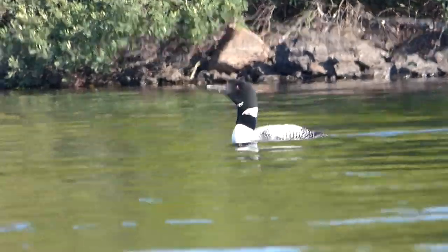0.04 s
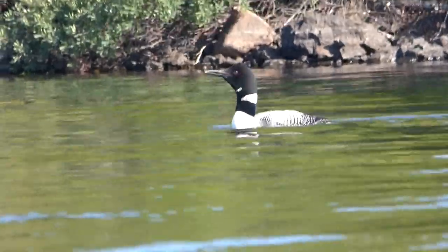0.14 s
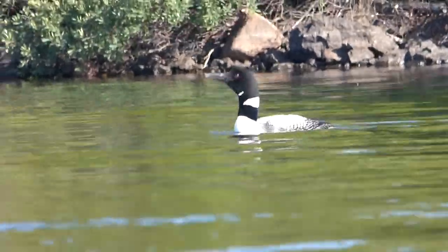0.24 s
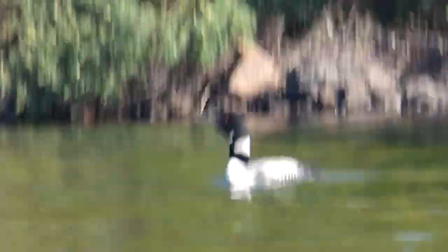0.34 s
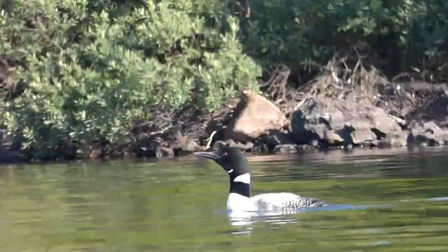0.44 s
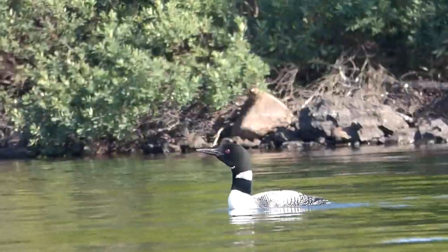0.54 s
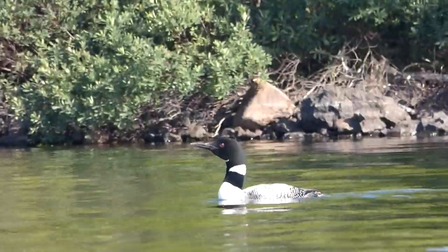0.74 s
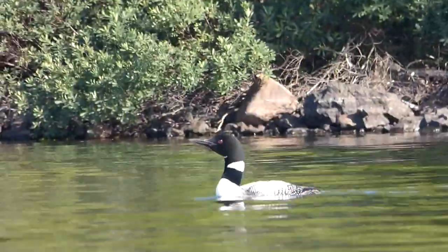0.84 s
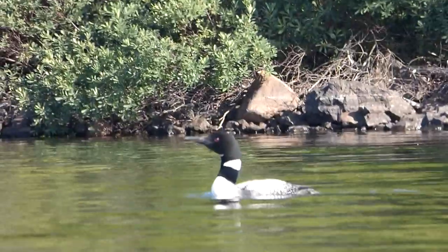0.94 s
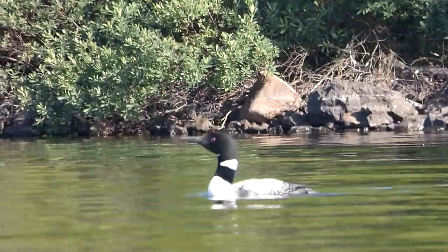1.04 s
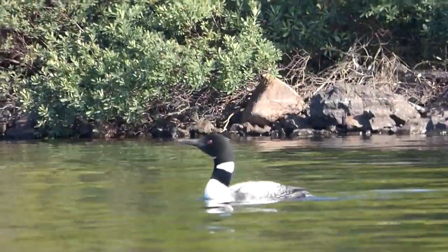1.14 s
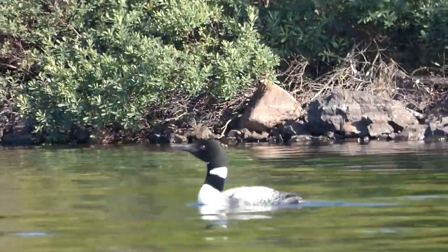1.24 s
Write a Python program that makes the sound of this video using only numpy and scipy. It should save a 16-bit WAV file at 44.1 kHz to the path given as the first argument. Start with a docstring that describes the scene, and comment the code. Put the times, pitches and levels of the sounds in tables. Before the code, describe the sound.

One quavering loon call rings out over gentle wavelets and light wind on the microphone.

```python
"""A loon gives one tremolo call across a lake: a reedy low opening breaks upward into a loud, nearly
pure high register whose pitch swings ten times a second. The wooded shore scatters back a faint echo.
Close by, wavelets gurgle with gliding bubbles and spatter droplets, wind bumps the microphone and a
hand-held camera ticks softly, all over a soft wash of water and air, with the camera's faint whir."""
import sys
import numpy as np
from scipy import signal
from scipy.fft import rfft, irfft
from scipy.io import wavfile
from scipy.ndimage import uniform_filter1d

SR = 44100
rng = np.random.default_rng(int(sys.argv[2]) if len(sys.argv) > 2 else 0)


def generate_wav(signal):
    """Clip the signal to [-1, 1] and save it as 16-bit WAV at the path in sys.argv[1]."""
    frames = np.transpose(np.atleast_2d(signal))
    scaled = np.clip(frames, -1, 1) * 32767
    pcm = np.round(scaled).astype(np.int16)
    wavfile.write(sys.argv[1], SR, pcm)


N = 57330

# reedy opening in the low register: time_s, pitch_hz, level_db
CALL_OPENING = [(.145, 722.3, -80), (.162, 692.6, -29), (.182, 662, -45), (.2, 694, -36),
                (.215, 791.5, -27.5), (.236, 840, -24), (.258, 802.4, -27.5), (.275, 735, -31.5),
                (.293, 695, -33.5), (.31, 813, -27.5), (.325, 898, -20.5), (.331, 870, -61)]
# second tone that beats with the voice at the upward break: time_s, pitch_hz, level_db
CALL_BREAK = [(.325, 1262, -23), (.331, 1315, -19.5), (.341, 1273, -20.5), (.365, 1240, -52)]
# tremolo in the high register: time_s, pitch_hz, level_db
CALL_TREMOLO = [(.326, 1434, -17), (.331, 1485, -18.5), (.343, 1511, -13.5), (.358, 1426, -18.5),
                (.377, 1275, -24.5), (.394, 1209, -30), (.405, 1352, -17), (.425, 1488, -13),
                (.44, 1540, -11.5), (.456, 1492, -14.5), (.476, 1301, -24), (.497, 1217, -32),
                (.511, 1335, -18), (.529, 1471, -11), (.546, 1524, -11), (.561, 1473, -15.5),
                (.58, 1310, -23.5), (.6, 1165, -30), (.617, 1240, -32)]
# swoop in the middle register: time_s, pitch_hz, level_db
CALL_SWOOP = [(0.609, 968.6, -40.5), (0.622, 997.4, -24.5), (0.63, 1065, -16), (0.639, 1206, -12),
              (0.652, 1257, -16), (0.657, 1213, -31), (0.673, 1260, -34)]
# last swing in the high register: time_s, pitch_hz, level_db
CALL_LAST_SWING = [(0.641, 1416, -55), (0.651, 1437, -12.5), (0.662, 1469, -15), (0.678, 1380, -19.5),
                   (0.695, 1285, -26), (.712, 1188, -28.5), (0.727, 1210, -53)]
# closing drop to the low register: time_s, pitch_hz, level_db
CALL_CLOSING = [(0.715, 1020, -32), (0.725, 921, -41), (0.725, 693, -34.5), (0.746, 683, -34.5),
                (0.796, 663.6, -42.5), (0.804, 664, -33)]
# overtones of the opening, against a fundamental at LOW_REF_DB: frequency_hz, relative_db
LOW_TIMBRE = [(1400, 1.5), (1660, -0.5), (1850, -13), (3400, -31.5), (3950, -23), (4400, -30), (5350, -14),
              (7400, -20), (8600, -27), (11000, -37)]
# overtones of the other notes, against a fundamental at HIGH_REF_DB: frequency_hz, relative_db
HIGH_TIMBRE = [(2200, -27), (2900, -43.5), (3800, -28.5), (5100, -34.5), (5800, -26.5), (7700, -31),
               (10800, -38), (12500, -85)]
# notches between throat resonances, where passing overtones drop out: centre_hz, gain_db
THROAT_NOTCHES = [(6150, -16), (7130, -10), (8680, -10)]
# stretches of shore that throw back the top of each swing: delay_s, gain_db
SHORE_RETURNS = [(0.144, -23.5), (0.279, -19.5), (.47, -28.5)]
# bubbles in the lapping water: start_s, length_s, start_hz, end_hz, level_db
WATER_BUBBLES = [(0.569, 0.058, 482, 529, -37.5), (0.844, 0.062, 320, 364, -41),
                 (0.885, 0.024, 429, 555.6, -32.5), (0.904, 0.027, 561, 887, -34.5),
                 (1.191, 0.016, 1667, 1676, -44), (.38, 0.036, 486, 515, -49), (0.671, 0.1, 354, 366, -47),
                 (1.027, 0.073, 332.4, 331, -44), (1.115, 0.024, 1136, 1227, -35),
                 (1.122, 0.04, 268, 290, -34.5), (1.149, 0.025, 638, 950, -37)]
# slaps and spatter of wavelets: start_s, level_db, centre_hz, decay_s, pan_db
WATER_SLAPS = [(0.521, -43.5, 5220, 0.0036, 0), (0.704, -45.5, 8400, 0.012, 8),
               (0.719, -31, 8470, 0.003, 9.5), (0.796, -42.5, 5980, 0.0038, 5),
               (0.76, -42.5, 7400, 0.008, 7), (0.888, -39, 4800, 0.004, 7), (0.907, -42.5, 4280, 0.003, 1),
               (0.932, -45, 3607, 0.0016, 8), (1.03, -47.5, 8595, 0.0046, 0.5),
               (1.031, -29, 1436, 0.0029, -5), (1.044, -40.5, 8495, 0.0036, -3),
               (1.047, -40.5, 4600, 0.006, -2), (1.106, -38.5, 2560, 0.0047, 4.5),
               (1.115, -30.5, 934, 0.0073, 10), (1.122, -34.5, 390, 0.0046, 4),
               (1.121, -36, 4840, 0.0026, 5.5), (1.129, -37, 8800, 0.0038, 2.5),
               (1.167, -45.5, 8390, 0.0056, -5), (1.188, -43, 7095, 0.0014, -2),
               (1.236, -47, 4440, 0.0055, 6)]
# wavelets that throw droplets: centre_s, half_length_s
DROPLET_SPRAYS = [(0.717, 0.12), (0.853, 0.022), (1.103, 0.063)]
# wind bumps on the microphone: peak_s, level_db, centre_hz, rise_s, decay_s
WIND_BUMPS = [(0.074, -40.5, 144, 0.031, 0.047), (0.126, -40.5, 102, 0.049, 0.02),
              (0.193, -31, 117, 0.029, 0.04), (0.231, -41.5, 106, 0.0046, 0.082)]
# soft low knocks: start_s, length_s, start_hz, end_hz, level_db
LOW_KNOCKS = [(.2, 0.015, 366, 79, -25.5), (.561, 0.021, 158, 91, -38.5), (0.958, 0.036, 122, 67.7, -41.5)]
# camera ticks: start_s, level_db
CAMERA_TICKS = [(0.063, -30.5), (0.155, -29.5), (0.259, -32), (0.563, -35), (0.763, -39.5), (0.86, -31)]
# ring of the camera body: frequency_hz, relative_db
TICK_SPECTRUM = [(100, -9), (450, -11), (750, -6.5), (1200, 9.5), (1500, -6), (2100, 1.5), (3000, -18.5),
                 (6000, -21), (15000, -40)]
# wash of water and air, common to both sides: frequency_hz, relative_db
LAKE_SPECTRUM = [(25, -22), (70, -7.5), (330, -1.5), (420, -7.5), (500, 9), (600, 0), (1600, -5),
                 (2600, -18), (8000, -24), (15000, -30.5)]
# soft whir of the camera mechanism, differing between the sides: frequency_hz, relative_db
CAMERA_WHIR_SPECTRUM = [(25, -25), (380, -14.5), (550, 3.5), (780, 10.5), (1250, -3.5), (1700, -17),
                        (3000, -27.5), (15000, -48)]
# fader ride on the wash of water and air: time_s, gain_db
LAKE_SWELL = [(0, 2), (.2, 2.5), (.9, 2.5), (0.989, 0), (1.126, 7.5), (1.22, 2)]

LOW_REF_DB, HIGH_REF_DB = -24, -23
LOW_GROWTH, HIGH_GROWTH = 2.38, 0.72  # dB of overtone per dB of fundamental


def loon():
    """The call: an opening that turns reedy as it swells, a raspy break, then nearly pure tones."""
    voice = voice_note(CALL_OPENING, LOW_TIMBRE, LOW_REF_DB, LOW_GROWTH)
    voice += voice_note(CALL_TREMOLO, HIGH_TIMBRE, HIGH_REF_DB, HIGH_GROWTH)
    purer = np.array(HIGH_TIMBRE) + [0, -2]  # overtones 2 dB down
    for curve in (CALL_BREAK, CALL_SWOOP, CALL_LAST_SWING, CALL_CLOSING):
        voice += voice_note(curve, purer, HIGH_REF_DB, HIGH_GROWTH)
    break_s, rasp_rise_s = CALL_BREAK[0][0], 0.024
    puff = burst(break_s + rasp_rise_s, rasp_rise_s, decay_s=0.025)
    rasp = amp(-43) * puff * noise(hump(6700, octaves=0.43, skirt_db=-35))
    lead_rad = 0.23  # the voice reaches the left side slightly earlier
    stereo = (voice * np.exp(0.5j * lead_rad * np.array([[1], [-1]]))).real
    return pan(stereo + rasp, -1)


def voice_note(curve, timbre, ref_db, growth):
    """One note as a complex wave: a clean fundamental with overtones shaped by the throat."""
    glide_s, swell_s, edge_s = 0.009, 0.006, 0.002
    flutter_db, lean_db, notch_width_hz = 1.6, 4, 170
    times, curve_hz, curve_db = np.transpose(curve)
    t = np.arange(N) / SR
    contour_hz = np.interp(t, times, curve_hz)
    jitter = 0.002 * unit(smooth(rng.standard_normal(N), 0.005))
    hz = smooth(contour_hz, glide_s) * (1 + jitter)
    rising = smooth(np.sign(np.gradient(contour_hz)), 2 * glide_s)
    level_db = smooth(np.interp(t, times, curve_db), swell_s)
    drive_db = ref_db + growth * (level_db - ref_db)
    fundamental = np.exp(2j * np.pi * np.cumsum(hz) / SR)
    wave, partial = amp(level_db) * fundamental, fundamental
    for k in range(2, 14):
        partial = partial * fundamental * np.exp(2j * np.pi * rng.random())
        flutter = flutter_db * unit(smooth(smooth(rng.standard_normal(N), 0.0011), 0.0089))
        notches = sum(db * np.exp(-((k * hz - at) / notch_width_hz) ** 2) for at, db in THROAT_NOTCHES)
        lean = -(-1) ** k * lean_db * rising  # odd overtones flare on the way up, even on the way down
        wave += partial * amp(drive_db + read(timbre, k * hz) + notches + lean + flutter)
    gate = np.clip(np.minimum(t - times[0], times[-1] - t) / edge_s, 0, 1)
    return gate * wave


def shore_echo(call):
    """The shore's answer: a long faint tail, ringing returns of the pitch peaks and a short near slap."""
    ring_hz, ring_width_hz = 1495, 26.7  # near the top of each swing
    ring = signal.lfilter(*signal.iirpeak(ring_hz, ring_hz / ring_width_hz, SR), call)
    tail = amp(-21) * reflections(call, delay_s=0.12, t60_s=3.9)
    returns = sum(amp(db) * reflections(ring, delay_s, t60_s=0.55) for delay_s, db in SHORE_RETURNS)
    near = amp(-22.5) * reflections(call, delay_s=0.0027, t60_s=0.2, spread=0.32)
    return pan(tail + returns + near, -3.4)


def reflections(sound, delay_s, t60_s, spread=0.61, taps_per_s=2000):
    """Rocks and trees scatter a sound into a fading cloud of reflections."""
    t = np.arange(N) / SR - delay_s
    taps = rng.standard_normal((2, N)) * (rng.random((2, N)) < taps_per_s / SR)
    mid, side = taps * (t > 0) * amp(-60 * abs(t) / t60_s)
    response = mid_side(mid, spread * side)
    response /= np.linalg.norm(response[0])
    return signal.fftconvolve(sound.mean(0)[None], response, axes=1)[:, :N]


def wavelets(rise_s=0.0016):
    """Lapping water: bubbles gurgle as gliding tones, slaps spatter as short bursts of noise."""
    out = np.zeros((2, N))
    for start_s, *bubble in WATER_BUBBLES:
        add(out, start_s, blip(*bubble))
    for start_s, db, hz, decay_s, pan_db in WATER_SLAPS:
        envelope = amp(db) * burst(start_s + rise_s, rise_s, decay_s)
        out += pan(envelope * noise(hump(hz, octaves=0.23, skirt_db=-16)), pan_db)
    return out


def droplets(peak_per_s=560, decay_s=0.00053):
    """Tiny bright drops land at random, thickest as each wavelet comes in."""
    t = np.arange(N) / SR
    density = sum(np.exp(-((t - centre_s) / half_s) ** 2) for centre_s, half_s in DROPLET_SPRAYS)
    hits = rng.random(N) < peak_per_s / SR * density
    strength = amp(4 * np.minimum(rng.exponential(1, N), 3))
    envelope = signal.lfilter([1], [1, -np.exp(-1 / (decay_s * SR))], hits * strength)
    fizz = noise(hump(6930, octaves=0.46, skirt_db=-1))
    return pan(amp(-60.5) * unit(envelope * fizz), 1.6)


def wind(spread=0.31):
    """Gusts bump the microphone with low noise, partly different on each side."""
    out = np.zeros((2, N))
    for peak_s, db, hz, rise_s, decay_s in WIND_BUMPS:
        mid, side = (noise(hump(hz, octaves=0.69, skirt_db=-49)) for _ in range(2))
        out += amp(db) * burst(peak_s, rise_s, decay_s) * mid_side(mid, spread * side)
    return pan(out, 3.5)


def knocks():
    """Soft low knocks, each a short tone diving in pitch."""
    out = np.zeros(N)
    for start_s, *knock in LOW_KNOCKS:
        add(out, start_s, blip(*knock))
    return pan(out, 3.5)


def camera_ticks(rise_s=0.0022, decay_s=0.0066):
    """Dull ticks ring briefly in the camera body, different on each side."""
    envelope = sum(amp(db) * burst(start_s + rise_s, rise_s, decay_s) for start_s, db in CAMERA_TICKS)
    body = np.array([noise(lambda hz: read(TICK_SPECTRUM, hz)) for _ in range(2)])
    return pan(envelope * body, -3.5)


def lake_and_whir():
    """A soft wash of water and air, swelling as a wavelet arrives, with the camera's faint whir."""
    swell_db = np.interp(np.arange(N) / SR, *np.transpose(LAKE_SWELL))
    lake = amp(-45 + swell_db) * wash(LAKE_SPECTRUM)
    whir = amp(-37) * wash(CAMERA_WHIR_SPECTRUM)
    return mid_side(lake, whir)


def wash(spectrum, patch_db=3.5):
    """Noise in which small patches of the spectrum come and go."""
    framing = dict(nperseg=512, noverlap=384)
    frames = signal.stft(noise(lambda hz: read(spectrum, hz)), **framing)[2].T
    patches = uniform_filter1d(rng.standard_normal(frames.shape), size=6, axis=0)  # blur in time
    patches = unit(uniform_filter1d(patches, size=14, axis=1))  # blur in frequency
    return unit(signal.istft((frames * amp(patch_db * patches)).T, **framing)[1][:N])


def blip(length_s, start_hz, end_hz, db, skew=0.84):
    """A short gliding tone that swells and fades."""
    progress = np.arange(0, length_s, 1 / SR) / length_s
    phase = 2 * np.pi * np.cumsum(start_hz * (end_hz / start_hz) ** progress) / SR
    return np.sqrt(2) * amp(db) * np.sin(np.pi * progress ** skew) * np.sin(phase)


def burst(peak_s, rise_s, decay_s):
    """Envelope with an exponential attack and decay."""
    t = np.arange(N) / SR - peak_s
    return np.exp(np.minimum(t / rise_s, -t / decay_s))


def noise(colour):
    """Noise at rms 1, shaped by an EQ curve that maps Hz to dB."""
    gain = amp(colour(np.fft.rfftfreq(N, 1 / SR)))
    return unit(irfft(rfft(rng.standard_normal(N)) * gain, N))


def hump(centre_hz, octaves, skirt_db):
    """EQ curve: a rounded peak on a wider skirt."""
    def colour(hz):
        octaves_off = np.log2((hz + 1) / centre_hz)
        peak = np.exp(-0.5 * (octaves_off / octaves) ** 2)
        skirt = amp(skirt_db) / (1 + octaves_off ** 4) / (1 + (hz / 11000) ** 8)
        return 20 * np.log10(peak + skirt)
    return colour


def read(spectrum, hz):
    """Reads a spectrum on a log-frequency axis."""
    points_hz, points_db = np.transpose(spectrum)
    return np.interp(np.log(hz + 1), np.log(points_hz), points_db)


def amp(db):
    """Decibels to gain."""
    return 10 ** (np.asarray(db) / 20)


def unit(x):
    """Scales to rms 1."""
    return x / np.sqrt(np.mean(x ** 2) + 1e-20)


def smooth(x, span_s):
    """Moving average."""
    return uniform_filter1d(x, max(1, int(span_s * SR)), mode="nearest")


def pan(x, db):
    """Places a sound left (+) or right (-)."""
    return x * amp([[db / 2], [-db / 2]])


def mid_side(mid, side):
    """Mid and side to left and right."""
    return np.array([mid + side, mid - side])


def add(mix, start_s, sound):
    """Mixes a sound in at a time."""
    part = mix[..., max(0, round(start_s * SR)):][..., :sound.shape[-1]]
    part += sound[..., :part.shape[-1]]


def scene():
    """The loon and its echo over the close sounds and the background."""
    call = loon()
    mix = call + shore_echo(call) + wavelets() + droplets()
    return mix + wind() + knocks() + camera_ticks() + lake_and_whir()


def record(dry):
    """A steep low-pass trims the highest treble."""
    lowpass = signal.firwin(511, cutoff=15800, window=("kaiser", 9), fs=SR)
    return signal.oaconvolve(dry, lowpass[None], "same")


dry = scene()
out = record(dry)
generate_wav(out)
```